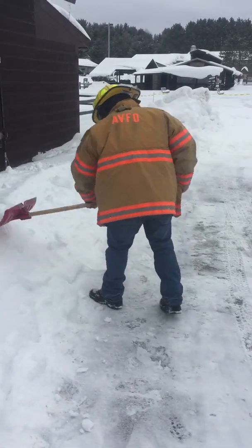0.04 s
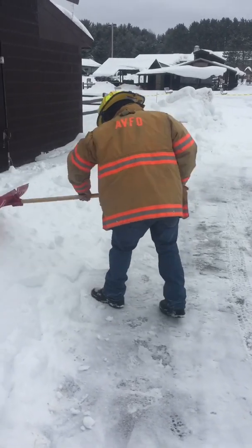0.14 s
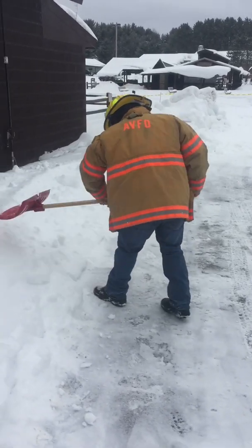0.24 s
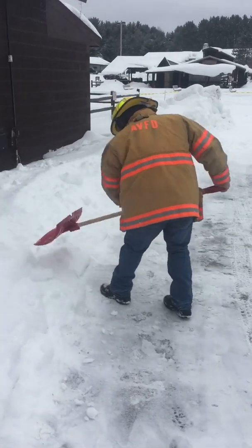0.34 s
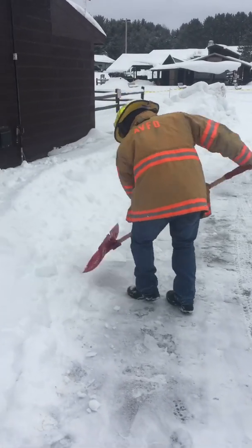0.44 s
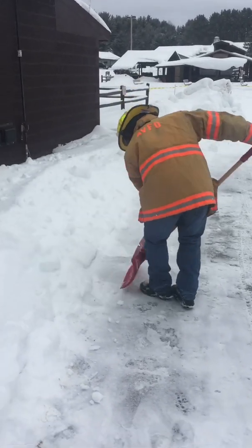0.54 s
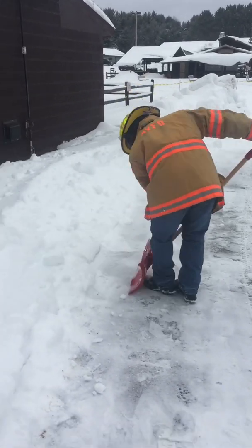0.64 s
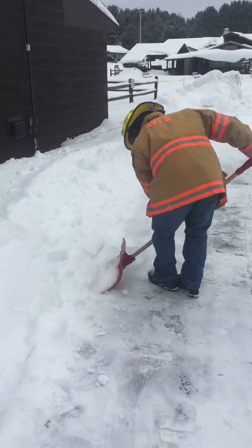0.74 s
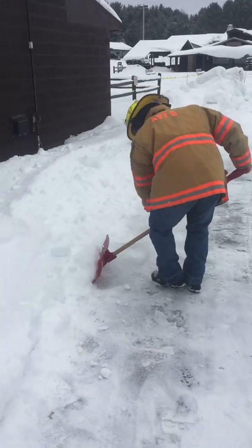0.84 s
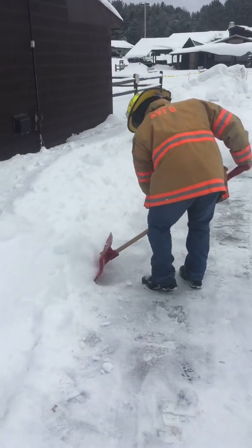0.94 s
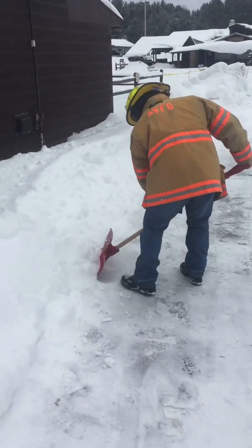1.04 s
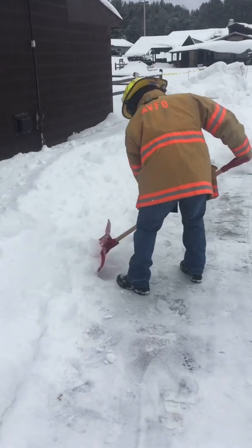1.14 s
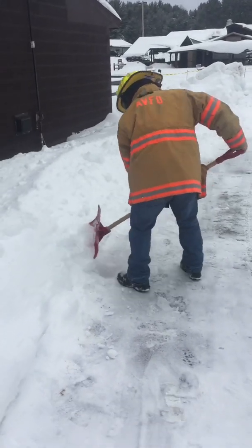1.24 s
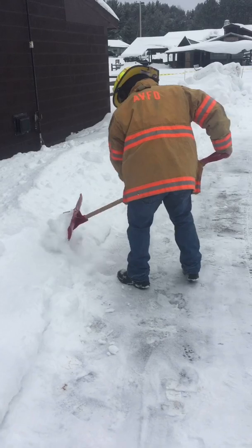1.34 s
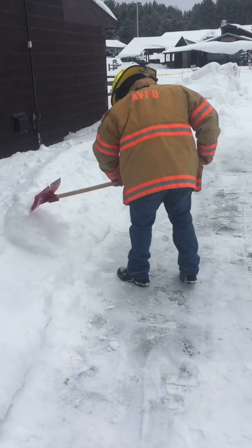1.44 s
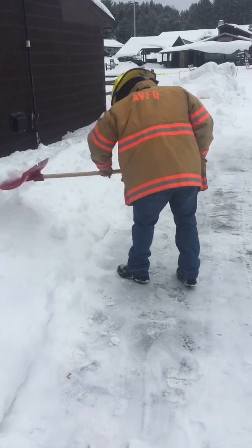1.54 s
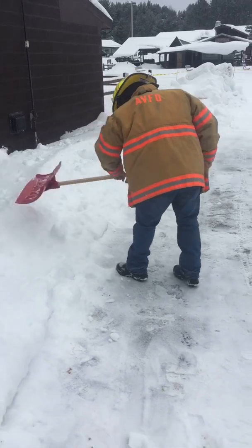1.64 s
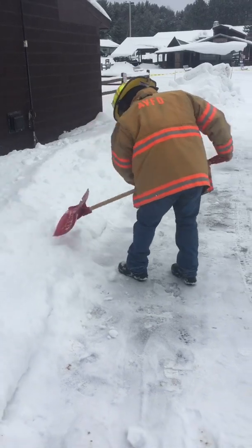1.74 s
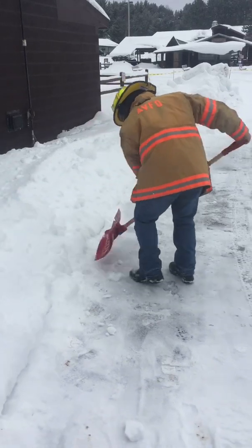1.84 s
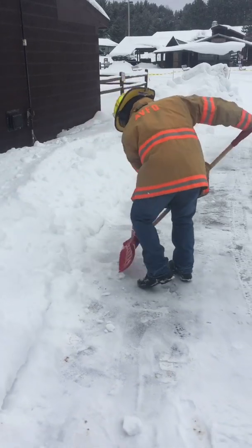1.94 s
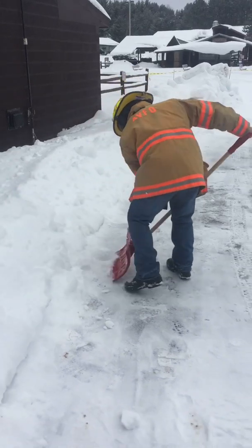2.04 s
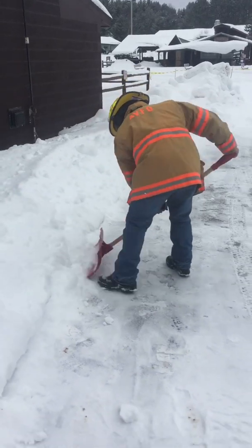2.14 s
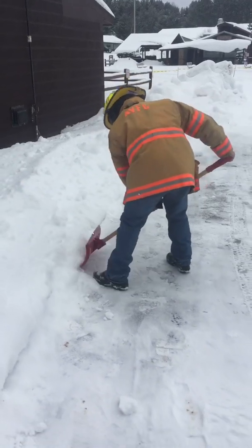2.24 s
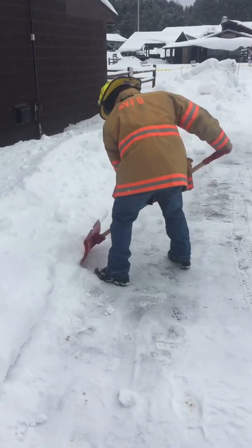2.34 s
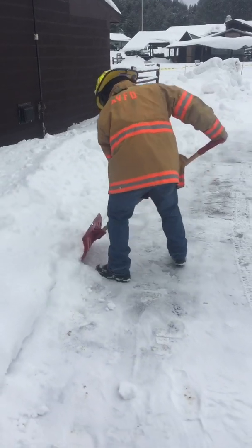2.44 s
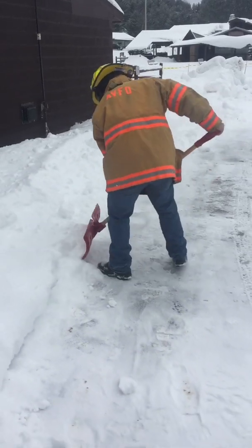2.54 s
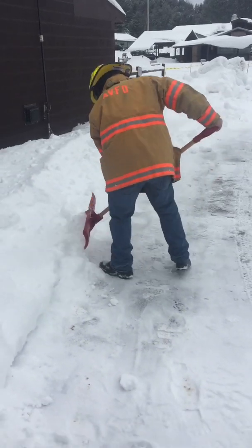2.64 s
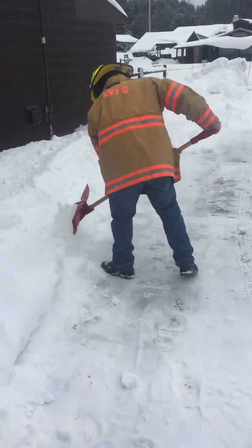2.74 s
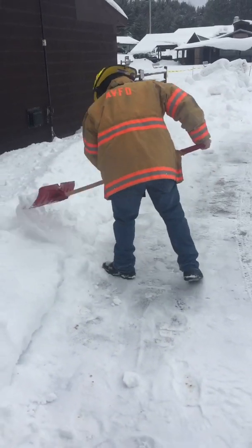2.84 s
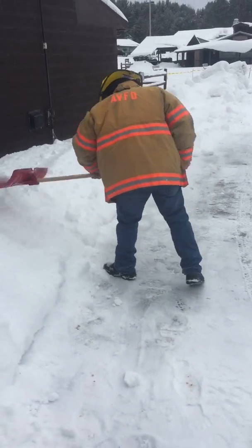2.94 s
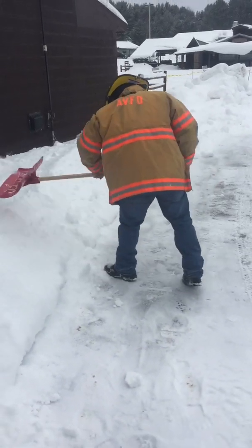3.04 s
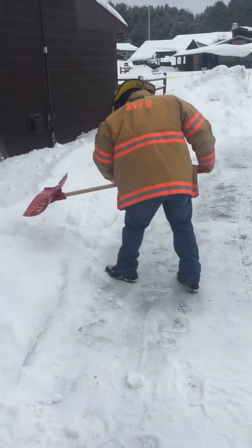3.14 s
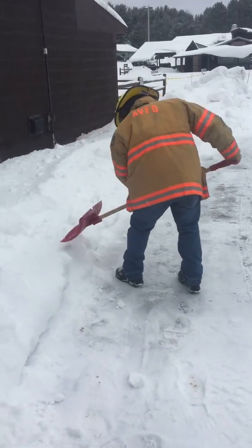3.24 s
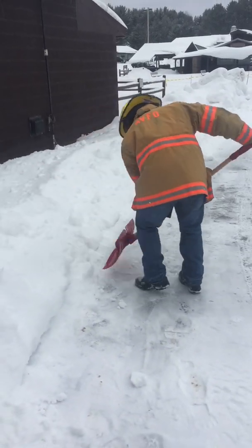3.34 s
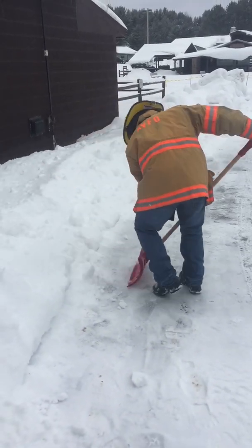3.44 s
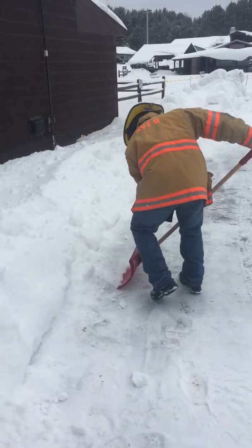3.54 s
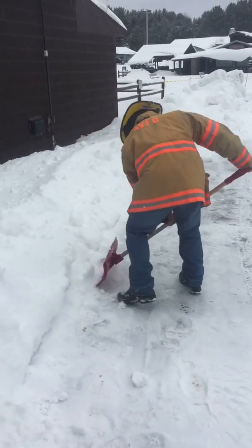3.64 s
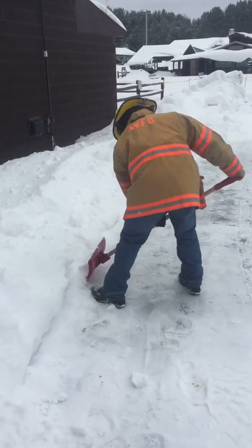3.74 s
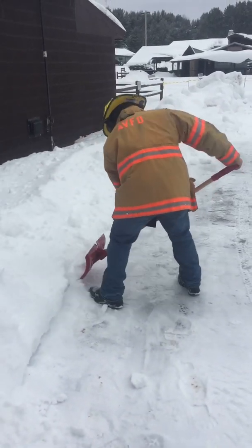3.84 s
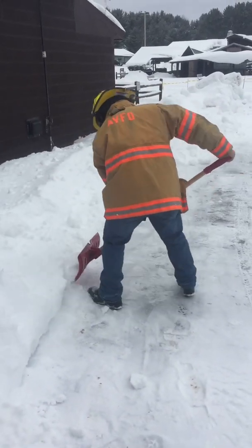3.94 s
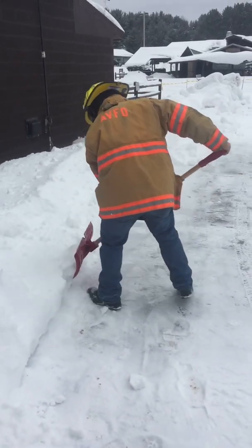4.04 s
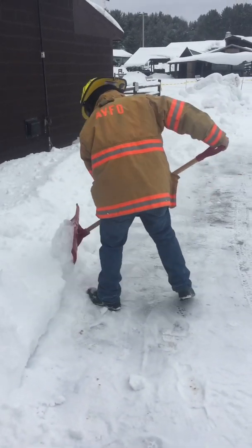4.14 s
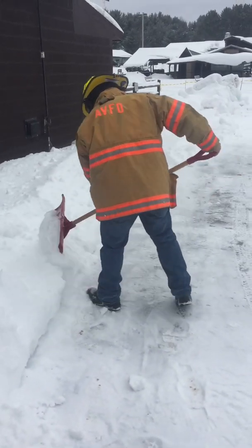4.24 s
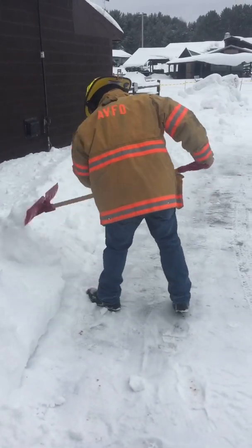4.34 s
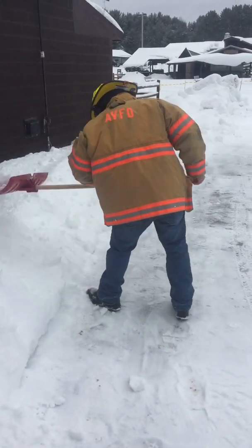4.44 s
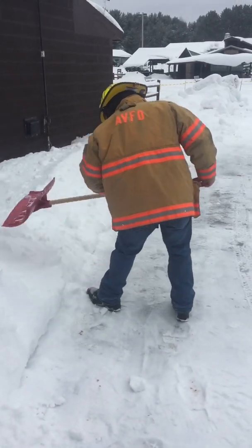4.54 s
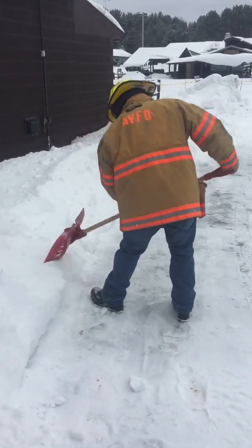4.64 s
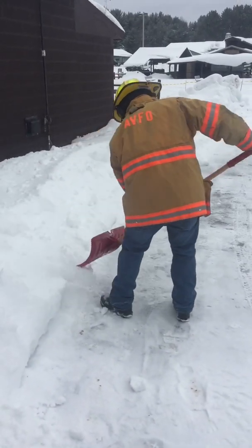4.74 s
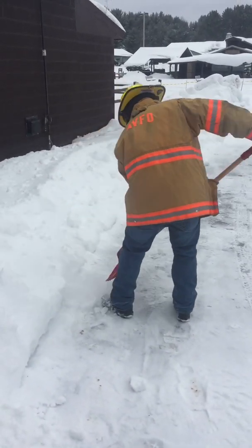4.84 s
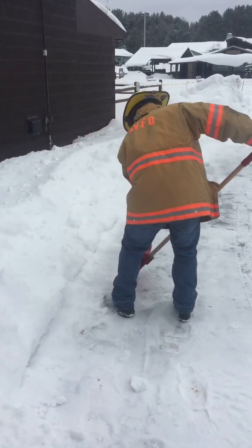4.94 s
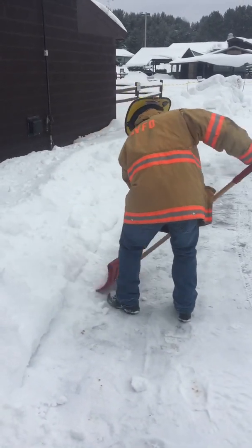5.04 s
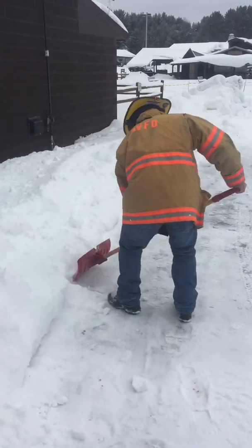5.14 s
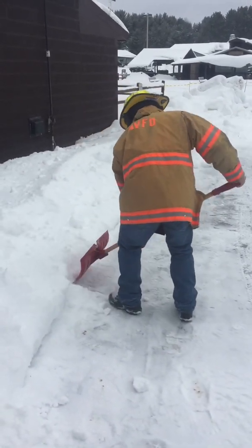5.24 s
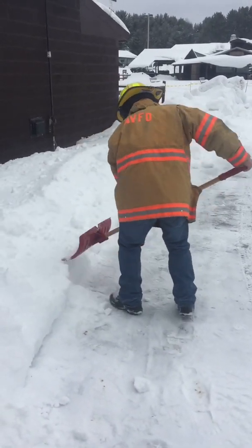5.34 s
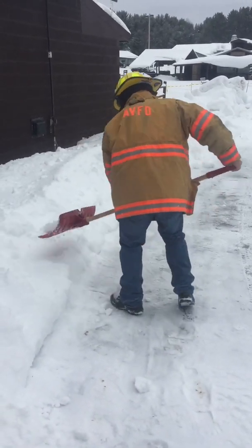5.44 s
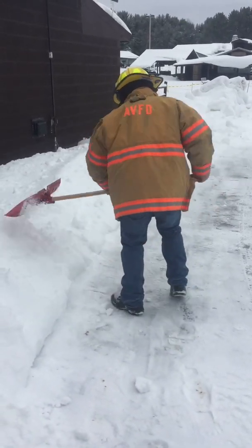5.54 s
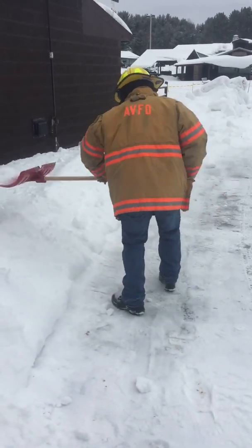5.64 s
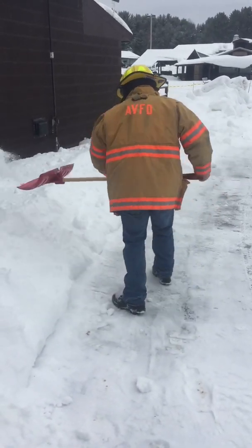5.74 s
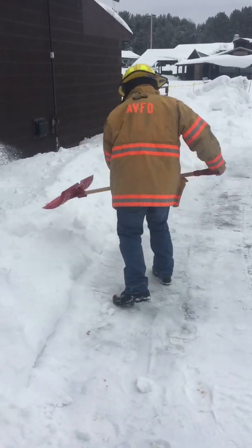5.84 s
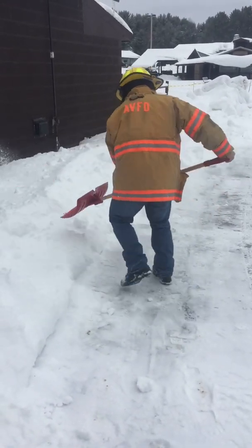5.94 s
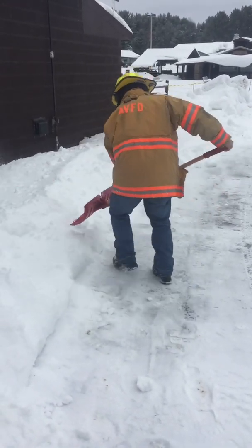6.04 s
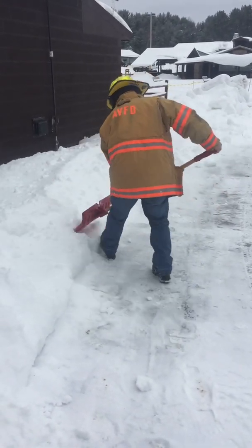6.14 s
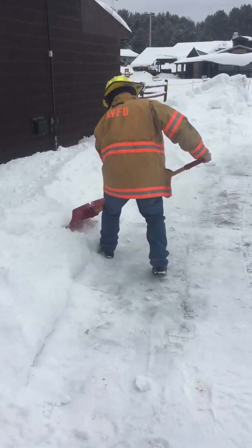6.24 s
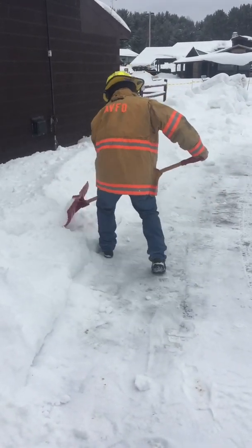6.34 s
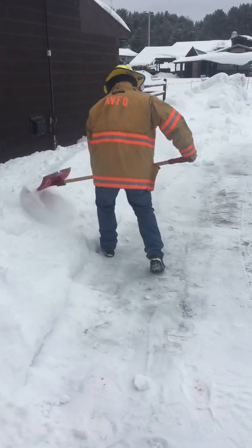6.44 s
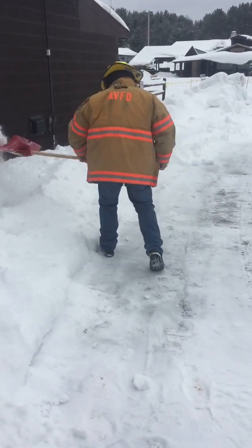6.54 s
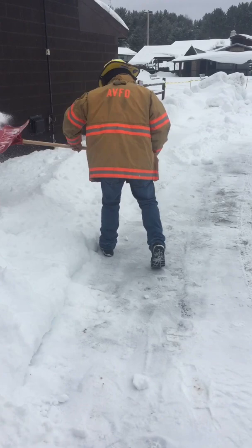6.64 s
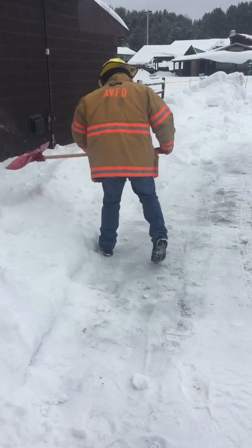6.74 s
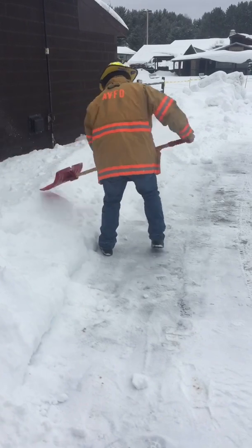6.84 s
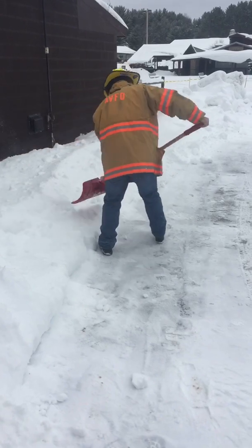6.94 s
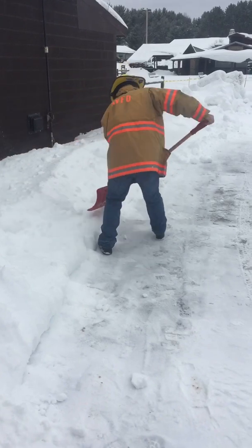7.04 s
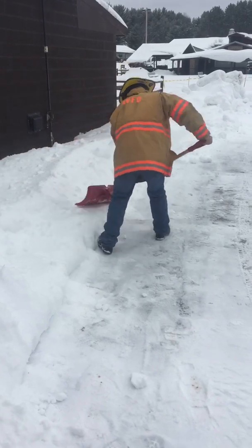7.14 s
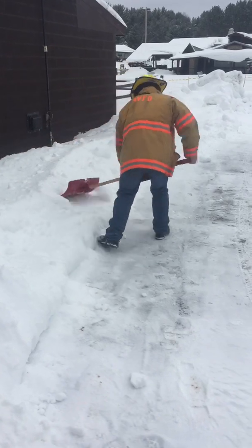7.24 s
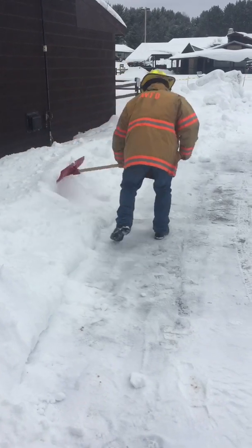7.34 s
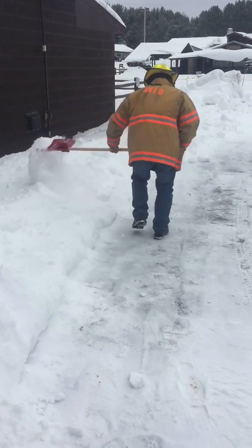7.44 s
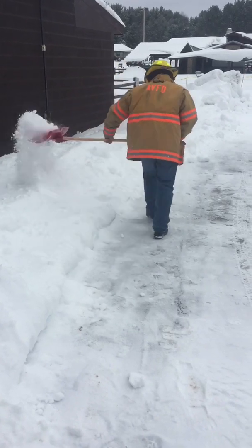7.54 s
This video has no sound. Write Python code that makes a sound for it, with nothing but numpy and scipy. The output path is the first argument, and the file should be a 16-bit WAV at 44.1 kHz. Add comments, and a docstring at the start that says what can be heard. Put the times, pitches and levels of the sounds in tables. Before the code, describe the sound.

Short, harsh shovel scrapes over ice and crusty snow, heard dry and fairly close in open air. Each push starts with a gritty bite, often a low thud, and breaks into bright cracks and crunches. Between pushes come soft sleeve swishes, loose snow sprays, boot scuffs and small grit snaps. Brief edge squeals and clacking blade rattles appear now and then over a very faint hush with light wind puffs.

```python
"""Someone in a heavy coat shovels packed snow off an icy path, a few metres away on a still day.
First, over a faint hush, sleeves swish, loose snow sprays and boots scuff: filtered random grains.
Then the blade is pushed in: slipping grains ring its modes, crystals fizz, the load crunches.
Blows thud and ice cracks as decaying noise bursts; now and then the edge squeals, a wavering tone.
Later the freed blade rattles. Swishes, scuffs and sprays return between the pushes."""
import sys
import numpy as np
from scipy import signal
from scipy.fft import rfft, irfft, next_fast_len
from scipy.io import wavfile
from scipy.ndimage import uniform_filter1d

SR = 44100
rng = np.random.default_rng(int(sys.argv[2]) if len(sys.argv) > 2 else 0)


def digitize_waveform(pressure):
    """Quantize a signal to 16-bit integers and store it at the path in sys.argv[1].

    Rows of a 2-D input are taken as channels; values are limited to [-1, 1].
    """
    field = np.atleast_2d(pressure).T
    bounded = np.clip(field, -1, 1)
    quanta = np.round(bounded * 32767).astype(np.int16)
    wavfile.write(sys.argv[1], SR, quanta)


N = 334278
TIME_S = np.arange(N) / SR

# spectra of far air, wind, sleeves, boots and clods, breaking crystals, packed snow, blade:
# (frequency [Hz], relative density [dB per Hz])
AIR_SPECTRUM = [(15, -50.5), (40, -28), (90, -11.5), (130, -17), (1400, -24.5), (3000, -31), (5000, -36),
                (16000, -38.5)]
PUFF_SPECTRUM = [(20, -20), (55, 4), (90, 3), (300, -24)]
SWISH_SPECTRUM = [(40, -18), (240, -9.5), (400, -15.5), (900, -3), (1400, 2.5), (2000, -1.5), (3000, -9),
                  (8000, -26)]
RUSTLE_SPECTRUM = [(40, -23), (100, -15), (240, -4), (420, -13.5), (700, 0.5), (1050, -2), (1330, 5),
                   (2500, -4), (3900, -3), (5000, -15.5), (8000, -39)]
FIZZ_SPECTRUM = [(2820, -44), (4800, -10.5), (5780, -3.5), (6660, -2.5), (7480, -5), (8400, -1.5),
                 (8960, 0.5), (10400, -7.5), (11700, -6.5), (15100, -16.5), (16000, -13)]
CRUNCH_SPECTRUM = [(25, -38), (110, -8.5), (250, -2), (500, -7), (1200, -32.5)]
GRINDING_SPECTRUM = [(300, -38.5), (550, -0.5), (1200, 1.5), (4200, -4.5), (5200, -11.5), (8000, -36)]
# modes of the blade, main one first: (frequency [Hz], width [Hz], gain [dB])
BLADE_MODES = [(1757, 283, 3), (2165, 150, 4.5), (2875, 710, -5.5), (3440, 100, 5.5), (3890, 1130, -2.5),
               (623, 118, -3), (880, 47, 1.5), (1182, 285, -0.5), (1303, 166, 6.5)]
# modes of the stiff strip along the blade's edge: (frequency [Hz], width [Hz], gain [dB])
EDGE_MODES = [(2790, 121.5, 3), (4810, 100, -14), (6520, 170, -7.5), (8380, 180, -8), (9580, 400, -14.5)]
# puffs of wind on the microphone: (peak time [s], length [s], level [dB])
WIND_PUFFS = [(0.64, 0.13, -49), (0.81, 0.27, -46), (1.34, 0.17, -50), (5.14, 0.12, -49)]
# sleeves swish as the load is swung: (peak time [s], length [s], level [dB])
SWINGS = [(0.028, 0.076, -40.5), (.093, 0.034, -39), (.147, 0.069, -37), (0.21, 0.14, -37),
          (1.61, 0.27, -42), (2.95, 0.48, -45.5), (3.1, 0.076, -42), (3.21, 0.08, -42), (4.56, 0.21, -51.5),
          (5.07, 0.055, -47.5), (5.62, 0.13, -47.5), (5.765, 0.28, -44), (6.65, 0.15, -45)]
# boots scuff over the snow: (peak time [s], length [s], level [dB])
STEPS = [(0.585, 0.13, -34), (2.01, 0.18, -37.5), (3.32, 0.056, -51), (3.415, 0.033, -36.5),
         (3.49, 0.2, -40.5), (4.8, 0.058, -41.5), (4.86, 0.098, -42), (5.845, 0.086, -37),
         (7.19, 0.045, -49)]
# loose snow slides off the blade and sprays down: (peak time [s], length [s], level [dB])
SPRAYS = [(0.025, 0.036, -41), (0.1, 0.22, -51.5), (0.265, 0.16, -40.5), (0.55, 0.18, -55),
          (0.71, 0.075, -49.5), (1.69, 0.12, -43.5), (2.13, 0.053, -47.5), (3.155, 0.1, -40),
          (4.785, 0.023, -39.5), (5.02, 0.17, -56.5), (5.64, 0.17, -48.5), (5.77, 0.08, -33),
          (6.762, 0.039, -46.5), (6.865, 0.023, -47.5), (7.5, 0.24, -56.5)]
# grit snaps under the boots: (time [s], peak [dB], pitch [Hz])
GRIT_SNAPS = [(0.083, -36, 1490), (0.337, -35.5, 1290), (0.581, -26, 1840), (2.053, -25, 2530),
              (3.398, -34, 1490), (7.175, -27.5, 4440)]
# the blade is pushed through the snow: (time [s], length [s], attack [s],
# grinding [dB], its change over the push [dB], fizz [dB], its change over the push [dB],
# lift of the main blade mode [dB], load crunch re grinding [dB], zing on glazed ice re fizz [dB],
# edge strip re grinding [dB], lift of the blade's low tones [dB])
PUSHES = [(0.728, 0.21, 0.0075, -27, 3.5, -24.5, -3, 4, -21.5, -4.5, -20, -1),
          (1.142, 0.319, 0.013, -35.5, -2, -44.5, 13, 1, -17.5, -34, -20, 2.5),
          (2.145, 0.16, 0.007, -27.5, 4.5, -21, -7.5, 2, -19.5, 0.5, -22, -1.5),
          (2.424, 0.32, 0.057, -38, 10, -40.5, 16, -2, -16.5, -45, -12.5, 3.5),
          (3.533, 0.3, 0.12, -34, 6.5, -33, 7, 1.5, -25, -10.5, -27, -0.5),
          (3.854, 0.34, 0.017, -32.5, -3, -32, -2.5, 0, -16.5, -22, -10.5, 2),
          (4.206, .2, 0.012, -27, -9, -27, -6, 0, -18, -26, -9, 6),
          (5.092, .15, 0.042, -21, -10.5, -24.5, -7, 2.5, -23, -17.5, -20.5, 1),
          (5.237, 0.21, 0.02, -25.5, 0.5, -21.5, -5.5, 0.5, -15.5, -20, -10.5, -1),
          (6.264, 0.25, 0.018, -25, -3.5, -21.5, -5.5, 2, -16, -20, -9.5, 2.5),
          (7.202, 0.23, 0.046, -44.5, 5.5, -35, -0.5, -0.5, -22, -9, -11, -12)]
# the edge bites into a harder patch: (peak time [s], length [s], grinding [dB], fizz [dB])
BITES = [(0.851, 0.092, -26, -22.5), (0.947, 0.049, -21, -25.5), (1.302, 0.036, -30.5, -30.5),
         (1.378, 0.029, -26.5, -22), (1.455, 0.029, -28, -24.5), (2.176, 0.012, -29, -23.5),
         (2.244, 0.03, -23.5, -36), (2.3, 0.014, -22.5, -42), (2.799, 0.041, -24.5, -20.5),
         (2.842, 0.048, -22.5, -20), (3.583, 0.031, -29, -31.5), (3.685, 0.041, -22.5, -18.5),
         (3.829, 0.032, -24, -25), (3.876, 0.059, -27, -29.5), (4.022, 0.11, -30.5, -32.5),
         (4.148, 0.029, -28, -26.5), (4.34, 0.031, -30.5, -28), (5.131, 0.03, -30, -25),
         (5.272, 0.036, -18.5, -15), (5.363, 0.08, -22, -22.5), (6.261, 0.034, -43, -37),
         (7.35, 0.075, -31, -27)]
# dull blows of blade and boots on packed snow: (time [s], peak [dB], pitch [Hz])
THUDS = [(0.73, -15.5, 656), (0.736, -21.5, 153), (0.927, -14.5, 890), (0.95, -19.5, 330),
         (1.457, -36, 634), (1.779, -43, 160), (2.30, -19.5, 630), (2.317, -28, 227), (3.063, -39, 330),
         (3.295, -41.5, 216), (3.361, -38.5, 170), (3.595, -37, 110), (3.828, -19.5, 225),
         (5.124, -21, 165), (5.134, -25.5, 88), (5.784, -34, 218), (6.685, -44, 280)]
# the edge cracks through lumps of ice: (time [s], peak [dB])
CRACKS = [(0.754, -12), (1.026, -23.5), (1.157, -20.5), (1.176, -20), (1.2416, -20), (1.291, -15),
          (2.148, -32), (2.574, -18), (2.596, -13), (2.639, -18.5), (2.68, -22), (2.696, -11.5),
          (2.732, -18), (2.7856, -25), (2.794, -14), (3.565, -30), (3.8234, -13), (4.127, -16.5),
          (4.2193, -15), (4.274, -16), (4.941, -37.5), (5.127, -11), (5.334, -12), (5.379, -19),
          (5.5868, -25.5), (5.6216, -24.5), (6.278, -14), (6.287, -14), (6.652, -29), (7.222, -49),
          (7.3204, -15.5)]
# the edge sticks and slips in a tone:
# (time [s], length [s], first pitch [Hz], last pitch [Hz], level before roughness [dB])
SQUEALS = [(1.124, 0.15, 274, 173, -31), (5.109, 0.054, 1780, 1750, -17.5),
           (5.246, .095, 1763, 1525, -17.5)]
# the blade rattles on its shaft as it comes free: (time [s], peak [dB], contact decay [s])
RATTLES = [(2.9538, -24, .012), (2.965, -30, 0.01), (4.567, -26, 0.0034), (4.577, -27, 0.0019),
           (5.4679, -16, 0.0031)]

AIR_DB = -61
# share of a swell's length that is its rise
GUST_RISE, SWING_RISE, STEP_RISE, SPRAY_RISE, BITE_RISE = 0.56, 0.59, 0.65, 0.72, 0.47
SOLE_FIZZ_DB, SOLE_CRUNCH_DB = -13, -16   # re scuff
CLODS_DB = -4   # re spray
RELEASE_S = 0.018   # the blade leaves the ground
CRUMBLE_DB, CRUMBLE_S = -21.5, 0.25   # the loosened load crumbles on
LOW_TONES_HZ = 750   # a shallow push hardly stirs the blade below this
CUTOFF_HZ = 15900


def from_db(db):
    """Decibels to gain."""
    return 10 ** (np.asarray(db) / 20)


def rms_one(x):
    """Scale to unit power."""
    return x / np.sqrt(np.mean(x ** 2) + 1e-20)


def drift(rate_hz):
    """Random line of RMS 1 through `rate_hz` new values a second."""
    knots = rng.standard_normal(8192)
    return rms_one(np.interp(TIME_S * rate_hz, np.arange(len(knots)), knots))


def coloured(x, spectrum):
    """Causal minimum-phase filter, built from the spectrum through its cepstrum."""
    size = next_fast_len(len(x) // 2 + 2048) * 2
    hz, db = np.transpose(spectrum)
    log_hz = np.log(np.maximum(np.arange(size // 2 + 1) * SR / size, 1))
    gain = from_db(np.interp(log_hz, np.log(hz), db))
    cepstrum = irfft(np.log(gain))
    # fold to the causal side
    cepstrum[1:size // 2] *= 2
    cepstrum[size // 2 + 1:] = 0
    response = np.exp(rfft(cepstrum))
    return irfft(rfft(x, size) * response)[:len(x)]


def resonance(x, hz, width_hz):
    """One mode, gain 1 on top."""
    r = np.exp(-np.pi * width_hz / SR)
    zeros = np.array([1, 0, -1]) * (1 - r * r) / 2
    poles = [1, -2 * r * np.cos(2 * np.pi * hz / SR), r * r]
    return signal.lfilter(zeros, poles, x)


def grains(per_s, spread_db):
    """Tiny fractures at random moments, of random sign and exponentially spread dB."""
    sizes = from_db(spread_db * np.minimum(rng.exponential(1, N), 4))
    signs = rng.choice([-1, 1], N)
    return rms_one(sizes * signs * (rng.random(N) < per_s / SR))


def clumps(rate_hz, depth_db):
    """Gain that bunches fractures into slips; mean power over 50 ms stays even."""
    gain = from_db(depth_db * drift(rate_hz))
    return gain / np.sqrt(uniform_filter1d(gain ** 2, size=2205))


def burst(decay_s):
    """A contact that crumbles away: noise with a fast decay."""
    t = TIME_S[:SR // 5]
    return rng.standard_normal(len(t)) * np.exp(-t / decay_s)


def add(out, time_s, peak_db, sound):
    """Put a sound into the track at its time and peak level."""
    start = max(round(time_s * SR), 0)
    part = out[start:start + len(sound)]
    scaled = from_db(peak_db) * sound / np.max(np.abs(sound))
    part += scaled[:len(part)]


def swells(rows, rise):
    """Gain of lopsided Gaussian swells, summed in power; `rise` is the share before the peak."""
    power, rise = np.zeros(N), np.clip(rise, .1, .9)
    for peak_s, length_s, db in rows:
        near = np.abs(TIME_S - peak_s) < 3 * length_s
        t = TIME_S[near] - peak_s
        side_s = length_s * np.where(t < 0, rise, 1 - rise)
        power[near] += (from_db(db) * np.exp(-(t / side_s) ** 2)) ** 2
    return np.sqrt(power)


def outdoors():
    """A faint far hush, with light low puffs of wind: coloured noise."""
    hush = rms_one(coloured(rng.standard_normal(N), AIR_SPECTRUM))
    wind = rms_one(coloured(rng.standard_normal(N), PUFF_SPECTRUM))
    return from_db(AIR_DB) * hush + swells(WIND_PUFFS, GUST_RISE) * wind


def swinging():
    """Clumped grains: sleeves rub, soles scuff and pack the snow, thrown snow and clods fall."""
    swing = swells(SWINGS, SWING_RISE)
    step = swells(STEPS, STEP_RISE)
    spray = swells(SPRAYS, SPRAY_RISE)
    rubbing = clumps(rate_hz=67, depth_db=2.5) * grains(per_s=2500, spread_db=1.0)
    sleeves = rms_one(coloured(rubbing, SWISH_SPECTRUM))
    scuffing = clumps(rate_hz=120, depth_db=1.5) * grains(per_s=3500, spread_db=-2.0)
    boots = rms_one(coloured(scuffing, RUSTLE_SPECTRUM))
    falling = clumps(rate_hz=87, depth_db=1.5) * grains(per_s=8100, spread_db=3.0)
    snow = rms_one(coloured(falling, FIZZ_SPECTRUM))
    clods = rms_one(coloured(grains(per_s=1200, spread_db=-1.0), RUSTLE_SPECTRUM))
    packing = clumps(rate_hz=46, depth_db=4.0) * grains(per_s=900, spread_db=2.5)
    soles = rms_one(coloured(packing, CRUNCH_SPECTRUM))
    steps = boots + from_db(SOLE_FIZZ_DB) * snow + from_db(SOLE_CRUNCH_DB) * soles
    return swing * sleeves + step * steps + spray * (snow + from_db(CLODS_DB) * clods)


def grit():
    """Grit snaps under the boots: a short burst through two broad resonances in series."""
    out = np.zeros(N)
    for time_s, db, hz in GRIT_SNAPS:
        snap = resonance(burst(decay_s=.002), hz, width_hz=hz)
        add(out, time_s, db, resonance(snap, hz, width_hz=hz))
    return out


def push(start_s, length_s, attack_s, db, change_db):
    """Gain of one push: attack, a hold that grows or sags, quick release, faint crumbling tail."""
    t = np.maximum(TIME_S - start_s, 0)
    after = np.clip(t - length_s, 0, 2)
    crumble = from_db(CRUMBLE_DB) * np.exp(-(after / CRUMBLE_S) ** 2)
    release = np.maximum(np.exp(-after / RELEASE_S), crumble)
    hold = from_db(db + change_db * np.minimum(t / length_s, 1))
    return np.minimum(t / attack_s, 1) * hold * release


def effort():
    """Gains of grinding and fizz: pushes and bites, summed in power."""
    grind = swells([(s, length, db) for s, length, db, _ in BITES], BITE_RISE) ** 2
    fizz = swells([(s, length, db) for s, length, _, db in BITES], BITE_RISE) ** 2
    for s, length, attack, grind_db, grind_change_db, fizz_db, fizz_change_db, *_ in PUSHES:
        grind += push(s, length, attack, grind_db, grind_change_db) ** 2
        fizz += push(s, length, attack, fizz_db, fizz_change_db) ** 2
    return np.sqrt(grind), np.sqrt(fizz)


def blade(force, direct_db, lifts=np.ones(len(BLADE_MODES))):
    """The blade rings, neighbouring modes in opposite phase; some force sounds straight from the snow."""
    modes = sorted(zip(BLADE_MODES, lifts), key=lambda mode: mode[0][0])
    ringing = 0
    for k, ((hz, width_hz, db), lift) in enumerate(modes):
        ringing = ringing + (-1) ** k * from_db(db) * resonance(lift * force, hz, width_hz)
    return coloured(ringing + from_db(direct_db) * force, GRINDING_SPECTRUM)


def edge(force, damping=1):
    """The edge strip rings in its modes; less damping narrows them, so they ring longer."""
    return sum(from_db(db) * resonance(force, hz, width_hz * damping)
               for hz, width_hz, db in EDGE_MODES)


def chinks(clicks, width_hz, count):
    """Splinters of ice ring briefly, each dealt one of `count` pitches."""
    dealt = rng.integers(0, count, N)
    pitches_hz = np.geomspace(4000, 14000, count) * rng.uniform(.98, 1.02, count)
    return rms_one(sum(resonance(clicks * (dealt == k) + 1e-18, hz, width_hz)
                       for k, hz in enumerate(pitches_hz)))


def scraping():
    """The edge advances in slips; each shakes the blade, shatters crystals and packs the load."""
    grind, fizz = effort()
    starts_s, *_, main_db, load_db, zing_db, edge_db, low_db = np.transpose(PUSHES)
    current = np.maximum(np.searchsorted(starts_s, TIME_S) - 1, 0)   # latest push begun
    slips = clumps(rate_hz=300, depth_db=1.0) * clumps(rate_hz=73, depth_db=0.6)

    # the contact wanders along the edge and favours one mode after another
    lifts = [from_db(2.6 * drift(rate_hz=32)) for _ in BLADE_MODES]
    lifts[0] = lifts[0] * from_db(main_db)[current]
    fine_grit = slips * grains(per_s=4000, spread_db=-0.5)
    coarse_chips = grains(per_s=260, spread_db=2.5)
    force = fine_grit + from_db(-5.5) * coarse_chips
    plate = rms_one(blade(force, direct_db=-11.0, lifts=lifts))
    lowpass = signal.butter(2, LOW_TONES_HZ, fs=SR, output="sos")
    low_lift = (from_db(low_db)[current] - 1) * signal.sosfiltfilt(lowpass, plate)
    strip = from_db(edge_db)[current] * rms_one(edge(force))
    body = grind * (plate + low_lift + strip)

    powder = clumps(rate_hz=640, depth_db=1.06) * grains(per_s=14000, spread_db=1.5)
    splinters = chinks(slips * grains(per_s=1500, spread_db=2.5), width_hz=90, count=44)
    shatter = rms_one(coloured(slips * powder + .55 * splinters, FIZZ_SPECTRUM))
    zing = from_db(zing_db)[current] * resonance(shatter, hz=11400, width_hz=2900)
    crystals = fizz * (from_db(-2.0) * shatter + zing)

    packing = slips * grains(per_s=2600, spread_db=-0.5)
    crunch = rms_one(coloured(packing, CRUNCH_SPECTRUM))
    return body + crystals + grind * from_db(load_db)[current] * crunch


def thuds():
    """Packed snow takes a blow with a short, heavily damped boom and a low crunch."""
    out = np.zeros(N)
    band = signal.butter(2, [60, 950], "band", fs=SR, output="sos")
    for time_s, db, hz in THUDS:
        force = burst(decay_s=0.021)
        boom = signal.sosfilt(band, resonance(force, hz, width_hz=0.49 * hz))
        add(out, time_s, db, boom + from_db(-8.5) * coloured(force, CRUNCH_SPECTRUM))
    return out


def cracks():
    """Ice gives way at once: a short, bright burst that rings the blade."""
    out = np.zeros(N)
    for time_s, db in CRACKS:
        force = burst(decay_s=.0055)
        shatter = from_db(-6.0) * coloured(force, FIZZ_SPECTRUM)
        add(out, time_s, db, blade(force, direct_db=-12.5) + shatter)
    return out


def squeals():
    """Regular stick-slip: a rough, wavering tone with a weak overtone; it sinks as the blade slows."""
    out = np.zeros(N)
    waver = .028 * drift(rate_hz=250)
    rough = from_db(3.5 * drift(rate_hz=160))
    for start_s, length_s, first_hz, last_hz, db in SQUEALS:
        now = (TIME_S >= start_s) & (TIME_S < start_s + length_s)
        u = (TIME_S[now] - start_s) / length_s
        pitch_hz = (first_hz + (last_hz - first_hz) * u ** 1.3) * (1 + waver[now])
        phase = 2 * np.pi * np.cumsum(pitch_hz) / SR
        tone = np.sin(phase) + from_db(-24) * np.sin(2 * phase)
        swell = np.sin(np.pi * u ** .7) ** 2
        out[now] += from_db(db) * rough[now] * swell * tone
    return out


def rattles():
    """Free of snow, the blade clacks on the shaft and its less damped edge rings on."""
    out = np.zeros(N)
    for time_s, db, contact_s in RATTLES:
        force = burst(decay_s=contact_s)
        clack = blade(force, direct_db=-9) + from_db(-11) * coloured(force, FIZZ_SPECTRUM)
        add(out, time_s, db, clack + from_db(13) * edge(force, damping=.6))
    return out


def scene():
    """Shovel and shoveller in the open air; the snow swallows all echoes."""
    shoveller = swinging() + grit()
    shovel = scraping() + thuds() + cracks() + squeals() + rattles()
    return (outdoors() + shoveller + shovel)[None]


def record(dry):
    """Steep elliptic low-pass."""
    lowpass = signal.ellip(10, .2, 80, CUTOFF_HZ, fs=SR, output="sos")
    return signal.sosfilt(lowpass, dry)


dry = scene()
out = record(dry)
digitize_waveform(out)
```